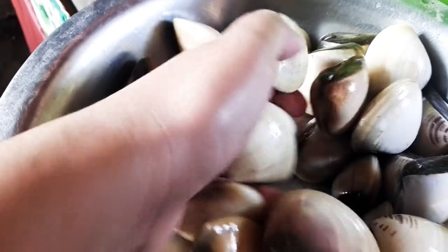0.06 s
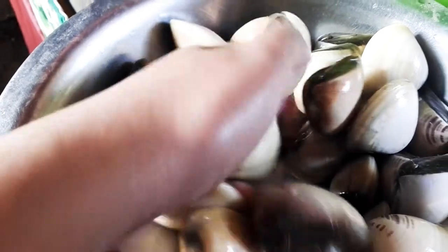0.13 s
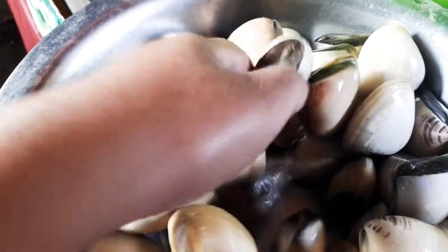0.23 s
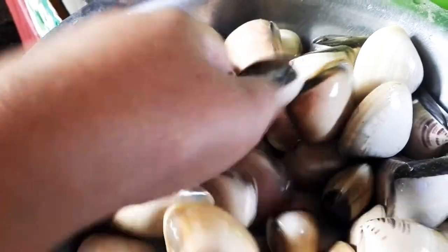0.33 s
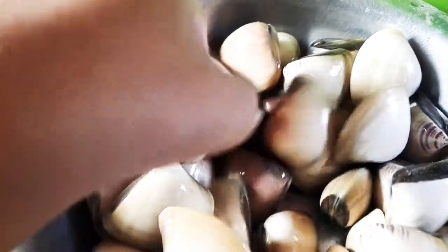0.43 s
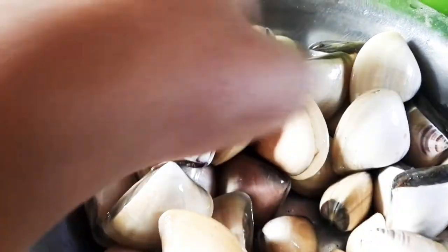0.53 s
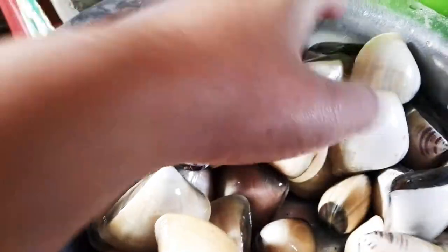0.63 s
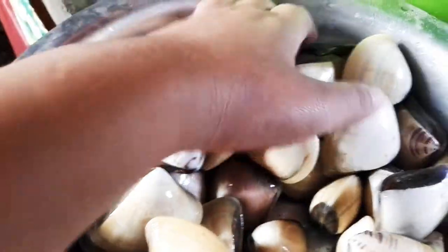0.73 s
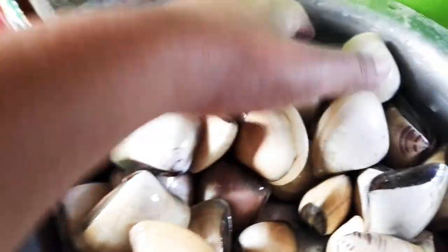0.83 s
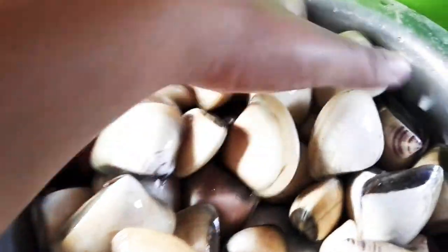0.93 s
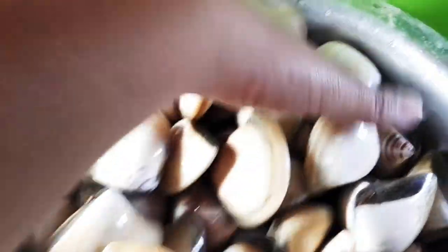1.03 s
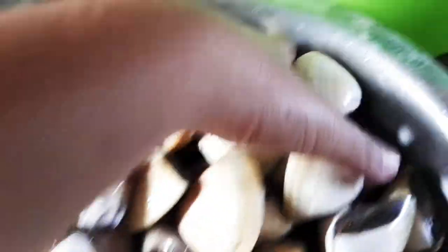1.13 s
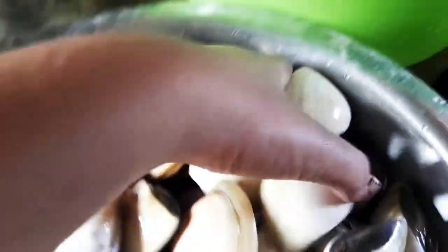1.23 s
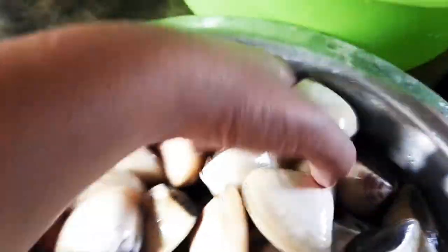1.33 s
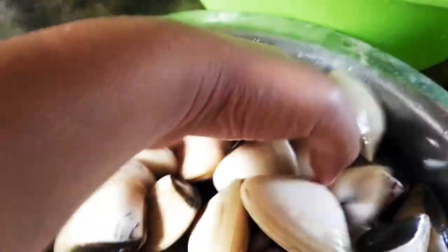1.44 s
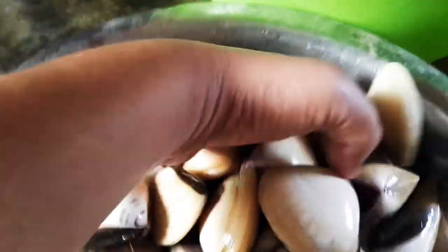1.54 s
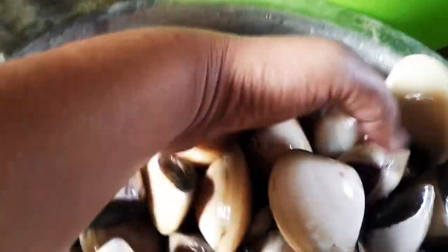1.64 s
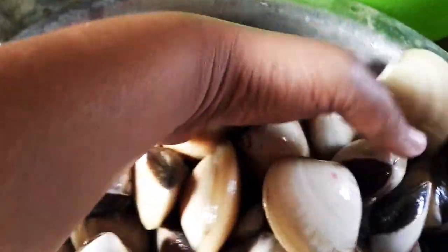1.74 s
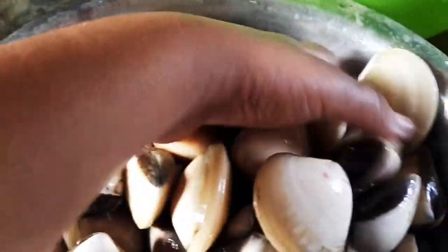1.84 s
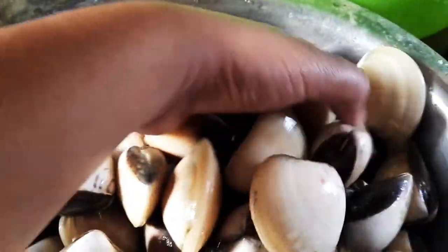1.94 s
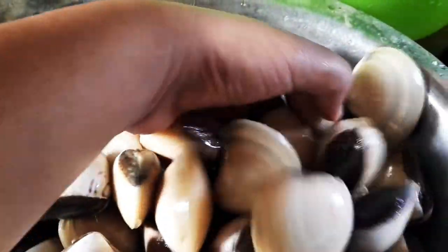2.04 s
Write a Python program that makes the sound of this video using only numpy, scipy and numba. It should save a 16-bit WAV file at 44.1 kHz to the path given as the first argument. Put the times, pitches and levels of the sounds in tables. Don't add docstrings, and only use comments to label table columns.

```python
import sys
import numpy as np
from scipy import signal
from scipy.io import wavfile
from scipy.ndimage import uniform_filter1d
from numba import njit

SR = 44100
rng = np.random.default_rng(int(sys.argv[2]) if len(sys.argv) > 2 else 0)


def voltage_ratio(level):
    return 10 ** (np.asarray(level, float) / 20)


def store_wav(level_fs):
    pcm = np.round(np.clip(np.atleast_2d(level_fs), -1, 1) * 32767)
    wavfile.write(sys.argv[1], SR, pcm.T.astype(np.int16))


N = 92610

# pitch_hz, density_db (dB per Hz)
KITCHEN_AIR = [(30, -3), (60, -7), (130, -9), (200, -27), (400, -37), (1000, -35), (2500, -46),
               (14000, -70)]
# time_s, firing_hz, level_db
ENGINE_CLIMB = [
    (.85, 110, -60),
    (1.08, 119, -51),
    (1.41, 128, -49),
    (1.45, 131, -58),
    (1.55, 133, -51),
    (1.68, 134, -53),
]
# pitch_hz, left_minus_right_db
PORT_SHADING = [(200, 5.5), (350, 0), (700, -14), (1300, -2.5), (4000, -.5), (10000, 2)]
# time_s, effort_db, weight_db (how deep in the heap it digs)
STIRRING = [(.03, -62.5, -5), (.112, -62, -6), (.19, -26, 8.5), (0.299, -38, -2.5), (.36, -25.5, 4),
            (0.439, -29, 1), (0.531, -47, -11), (0.601, -88, -7.5), (.71, -65.5, -11.5), (.8, -55, -12),
            (0.859, -40.5, -23), (0.978, -33, -6), (1.181, -41, 3), (1.258, -44, 2.5), (1.482, -28.5, 4.5),
            (1.8, -36, -7.5), (1.992, -48.5, -11.5), (2.04, -39.5, -1)]
# pitch_hz, density_db (dB per Hz)
SHELL_RING = [(150, -36.5), (260, -6), (445, -8.5), (776, -2.5), (1160, -4), (1860, -0.5), (14500, -20)]
# pitch_hz, width_hz, level_db
BOWL_MODES = [(305.9, 25.6, 0), (450, 18, -2.5), (531.6, 54, 1.5), (775, 31, 5), (1880, 28, 5.5),
              (2882, 20, 3.5)]
# time_s, peak_db, main_ring_hz, brightness_db, weight_db
STIRRED_CLACKS = [(0.074, -35, 6000, -2, -6), (0.091, -37, 2450, -2.5, -11), (0.118, -24.5, 781, -17.5, 12),
                  (0.133, -13.5, 3140, -26, 2), (.201, -24, 730, -17, 7), (0.206, -18.5, 4500, -27.5, -17),
                  (0.219, -1, 700, -29.5, 2.5), (.227, -8.5, 493, -31, 0), (0.236, -5, 5300, -4.5, 8.5),
                  (0.276, 0.5, 1990, -26, -15), (.301, -3, 800, -19.5, -10), (0.31, -8, 865, -13.5, -9),
                  (0.38, -19, 860, -24.5, 13), (0.4, -14.5, 824, -11.5, 11.5),
                  (0.408, -6.5, 783, -27, 11.5), (.419, -4.5, 1680, -13, -2), (.432, -18.5, 465, -22.5, 16),
                  (0.449, -2, 1184, -11, -18), (0.469, -5, 2990, -12.5, 2), (.479, -8.5, 3350, -30, -15),
                  (0.503, -12, 2330, -4.5, 5), (.514, -16, 4200, -12, 8.5), (0.729, -35, 750, 2.5, -14),
                  (0.813, -8.5, 980, -33, -5), (0.827, -13, 2180, -17, -18), (0.835, -17, 1254, -12, -5),
                  (.898, -25.5, 2290, -24.5, -12), (0.911, -13.5, 2960, -15.5, -10),
                  (0.942, -6, 2810, -32, -12), (0.947, -16.5, 920, -29, -8), (0.957, -12.5, 750, -2, 12),
                  (.992, -20, 760, -32, -1), (1.059, -15, 1360, -45.5, 6), (1.095, -20.5, 790, -32.5, 0),
                  (1.128, -18, 920, -6, 5), (1.16, -19, 1370, -7, -4), (1.238, -22, 3130, -20.5, -4),
                  (1.267, -19, 1980, -12.5, 0), (1.307, -9, 4680, -11, 2), (1.323, -17, 790, -5, 6)]
# time_s, peak_db, main_ring_hz, brightness_db, weight_db
SETTLING_CLACKS = [(1.359, -17, 740, -6, 3), (1.414, -15.5, 3100, -43, -5), (1.442, -10.5, 2650, -44, 6),
                   (1.456, -15.5, 596, 0, 8), (1.474, -13, 770, -27.5, 11), (1.489, -2.5, 3390, -13, -1),
                   (1.496, -6.5, 810, -14.5, 8.5), (1.514, -11, 443, -23, 2), (1.558, -12, 1670, -16.5, 6),
                   (1.598, -15, 2680, -2, 3), (1.63, -17, 2530, -25, 5), (1.64, -3, 4890, -13, 3),
                   (1.681, -14, 325, -18, 7.5), (1.704, -12.5, 2870, -37, -2), (1.722, -10, 765, -12.5, 6),
                   (1.751, -25.5, 327, 4.5, 10), (1.782, -22.5, 450, -15, 19), (1.812, -8, 1720, -25, 8.5),
                   (1.845, -26.5, 2680, -29.5, -6), (1.874, -10.5, 2700, -35, -6),
                   (1.884, -17.5, 2450, -20, 8.5), (1.896, -19.5, 4300, 11.5, -10),
                   (1.904, -26, 2620, -3, -6), (1.976, -25.5, 2500, -13, -14), (2.01, -19, 820, -9.5, -5),
                   (2.045, -21.5, 352, -18, 0), (2.094, -8.5, 2650, -13.5, 1)]
# start_s, length_s, level_db, main_ring_hz, brightness_db
TUMBLES = [(.001, .025, -41, 1465, -16), (0.122, 0.06, -24.5, 815, -8.5), (0.213, 0.036, -6, 428, -39),
           (0.252, .014, -4.5, 1692, -10.5), (0.261, 0.022, 6.5, 1880, -15), (.259, 0.022, 4, 775, -34.5),
           (0.637, 0.071, -47, 1300, -49), (0.287, .04, -1.5, 450, -14), (0.323, .03, -18, 527, -12.5),
           (0.373, .03, -8.5, 792, -16), (0.399, .04, -6, 916, -18.5), (0.46, 0.027, -14, 450, -15.5),
           (0.503, 0.037, -21, 450, -32.5), (0.727, .075, -34.5, 3240, -30.5),
           (0.903, 0.032, -21.5, 2660, -8.5), (0.934, 0.044, -12, 830, -16), (0.971, .05, -16.5, 752, -9),
           (1.131, .06, -14.5, 1434, -18), (1.365, 0.034, -22.5, 800, -19),
           (1.485, 0.025, -8.5, 3096, -12.5), (1.501, 0.049, -12, 375, -12),
           (1.54, 0.048, -17.5, 450, -6.5), (1.579, 0.033, -16.5, 2600, -5),
           (2.003, 0.056, -17.5, 359, -13)]

KITCHEN_DB, ROOM_DB, ROOM_T60_S, ROOM_DAMP = -56.5, -11, .165, 0.46
BASS_SIDE = .07
PORT_LAG_S, LAG_SPREAD_S, PAN_SPREAD_DB = .00026, .0003, 6
BOWL_DB, TABLE_DB, BODY_HZ = -15, 14.5, 292
THUD_AT_S, THUD_DB, THUD_HZ, THUD_T60_S = .259, -9.5, 78, 0.04
RING_S, RING_SLOPE, TILT = 0.029, 0.38, 0.72
LIGHT_DB_PER_OCT, HEAVY_HZ = 3.5, 653
KNOCK_DB, SLIDE_DB, GRIND_DB = -15, -19, -10
MAIN_DB, BLOW_DB = 2, 6.5
CHATTER_S, CHATTER_DB, GRAZE_S, GRAZE_DB = .014, -6, .0015, -13
SNAP_DB, SNAP_SHARE = -5.5, 0.33
CRACK_S, CRACK_DB, RASP_DB = 0.026, -4.5, -14
SCATTER_DB = 2
STICK_DB, STICK_S = 5, 0.015


def table(rows, hz):
    rows = np.array(rows)
    return np.interp(np.log(hz), np.log(rows[:, 0]), rows[:, 1])


def band(x, lo_hz, hi_hz):
    return signal.sosfilt(signal.butter(2, [lo_hz, hi_hz], "band", fs=SR, output="sos"), x)


def walk(rate_hz):
    k = int(SR / rate_hz)
    held = np.repeat(rng.standard_normal(N // k + 1), k)
    return 2.0 * uniform_filter1d(uniform_filter1d(held, k), k)[:N]


def kitchen():
    out = 0
    swell_db = np.interp(np.arange(N) / SR, [.15, .6, .8, 1.7, 1.9], [8.5, -2.5, -2, 3.5, 1])
    for hz in 28 * 2 ** np.arange(0, 9, .5):
        mid, side = band(rng.standard_normal((2, N)), hz / 1.1, hz * 1.2)
        level_db = table(KITCHEN_AIR, hz) + 0.82 * walk(2.8) + swell_db * (hz < 250)
        spread = np.clip(hz / 900., BASS_SIDE, 1) * side * np.array([[1], [-1]])
        out = out + voltage_ratio(level_db) * (mid + spread)
    return out * voltage_ratio(KITCHEN_DB + 3) / np.sqrt(np.mean(out ** 2))


def engine():
    t = np.arange(N) / SR
    time_s, firing_hz, level_db = np.array(ENGINE_CLIMB).T
    db = np.interp(t, np.r_[time_s[0] - .1, time_s, time_s[-1] + .06], np.r_[-85, level_db, -85])
    hz = np.interp(t, time_s, firing_hz) * (1 + 0.023 * walk(27))
    return np.sqrt(2) * voltage_ratio(db + 2 * walk(18)) * np.sin(2 * np.pi * np.cumsum(hz) / SR)


@njit
def walls(x, lags, gain, damp):
    line, soft, out = np.zeros((8, 4096)), np.zeros(8), np.zeros((2, len(x)))
    for i in range(len(x)):
        total = 0.
        for k in range(8):
            soft[k] += (1 - damp) * (gain[k] * line[k, (i - lags[k]) & 4095] - soft[k])
            total += soft[k]
            out[k % 2, i] += soft[k]
        for k in range(8):
            line[k, i & 4095] = x[i] + soft[k] - total / 4
    return out


def room(near):
    lags = rng.integers(250, 1300, 8)
    gain = voltage_ratio(-60 * lags / SR / ROOM_T60_S)
    return voltage_ratio(ROOM_DB) * walls(band(near.mean(axis=0), 300., 14000.), lags, gain, ROOM_DAMP)


def thud():
    age = np.maximum(np.arange(N) / SR - THUD_AT_S, 0)
    swell = 1 - np.exp(-age / 0.01)
    return voltage_ratio(THUD_DB - 60 * age / THUD_T60_S) * swell * np.sin(2 * np.pi * THUD_HZ * age)


def bowl(push, shove):
    out = np.zeros((2, N))
    for hz, width_hz, mode_db in BOWL_MODES:
        p = np.exp((2j * np.pi * hz - np.pi * width_hz) / SR)
        drive = shove if hz < HEAVY_HZ else push
        z = signal.lfilter([1], [1, -p], drive) * voltage_ratio(mode_db + BOWL_DB)
        left = (z * np.exp(-2j * np.pi * hz * PORT_LAG_S)).imag * voltage_ratio(table(PORT_SHADING, hz))
        out = out + np.array([left, z.imag])
    return out


@njit
def rings(start, hz, t60, left, right, lag, sr, n):
    out = np.zeros((2, n + 200))
    for g in range(len(hz)):
        p = np.exp(complex(-6.9 / (t60[g] * sr), 2 * np.pi * hz[g] / sr))
        z, i0, j0 = 1. + 0j, int(start[g] * sr), max(int((start[g] + lag[g]) * sr), 0)
        for i in range(max(min(int(t60[g] * sr), n - max(i0, j0)), 0)):
            out[0, j0 + i] += left[g] * z.imag
            out[1, i0 + i] += right[g] * z.imag
            z *= p
    return out[:, :n]


def contacts(t, db, bright_db, weight_db, main_hz=None, main_db=0, count=10, share=1.):
    u = rng.random((len(t), count))
    g = np.tanh(rng.standard_normal((len(t), count + 2)))
    hz = 250 * 56 ** ((np.arange(count) + u) / count)
    gain = db[:, None] + table(SHELL_RING, hz) + 10 * np.log10(hz / 800) + 2.2 * g[:, :count]
    gain = gain + TILT * bright_db[:, None] * np.clip(np.log2(hz / 1500) / 2, 0, 1)
    gain = gain + weight_db[:, None] * np.clip(2 * np.log2(HEAVY_HZ / hz), 0, 1)
    t60 = voltage_ratio(0.89 * g[:, count - 1::-1])
    if main_hz is not None:
        gain = gain - LIGHT_DB_PER_OCT * np.clip(np.log2(main_hz[:, None] / hz), 0, 2)
        hz[:, 0] = main_hz * (1 + 0.023 * g[:, 0])
        gain[:, 0] = db + main_db
        t60[:, 0] = 1
    t60 = t60 * share * RING_S * (1000 / hz) ** RING_SLOPE
    aside = np.clip(hz / 1200, 0, 1)
    pan = table(PORT_SHADING, hz) + PAN_SPREAD_DB * g[:, [count]] * aside
    lag = PORT_LAG_S + LAG_SPREAD_S * g[:, [count + 1]] * aside
    start = t[:, None] + 0.00022 * u[:, ::-1]
    sign = np.sign(g[:, :count])
    modes = (start, hz, t60, sign * voltage_ratio(gain + pan / 2), sign * voltage_ratio(gain - pan / 2), lag)
    return rings(*[np.ascontiguousarray(a).ravel() for a in modes], float(SR), N)


def blows(t, db):
    return np.bincount(np.clip((t * SR).astype(int), 0, N - 1), voltage_ratio(db), N)


def clacks(count=5):
    t, db, hz, bright, weight = np.array(STIRRED_CLACKS + SETTLING_CLACKS).T[:, :, None]
    u = rng.random((len(t), 2, count))
    late = (np.arange(count) + u[:, 0]) / count * (np.arange(count) > 0)
    fade = (CHATTER_DB - 14 * late + 8 * (u[:, 1] - .5)) * (late > 0)
    late[:, -1], fade[:, -1] = -GRAZE_S / CHATTER_S, GRAZE_DB
    main_db = np.where(late != 0, MAIN_DB, BLOW_DB)
    same = 0 * late
    return t + late * CHATTER_S, db + KNOCK_DB + fade, bright + same, weight + same, hz + same, main_db


def slides(size=20):
    t, length, db, hz, bright = np.array(TUMBLES).T[:, :, None]
    u, stir = rng.random((len(t), 2, size)), np.array(STIRRING)
    late = (np.arange(size) + u[:, 0]) / size
    swell = 20 * np.log10(0.094 + np.sin(np.pi * late ** 0.63)) + 7 * (u[:, 1] - .5)
    weight = np.interp(t, stir[:, 0], stir[:, 2])
    same = 0 * late
    return t + late * length, db + SLIDE_DB + swell, bright + same, weight + same, hz + same, MAIN_DB + same


def grinding(count=4200):
    stir, u = np.array(STIRRING), rng.random((count, 3))
    t = (np.arange(count) + u[:, 0]) / count * N / SR
    db = np.interp(t, stir[:, 0], stir[:, 1]) + GRIND_DB + STICK_DB / 3
    db = db - SCATTER_DB * np.log(1 - u[:, 1]) + 1.67 * walk(24.99)[(t * SR).astype(int)]
    hit_s = np.r_[np.array(STIRRED_CLACKS + SETTLING_CLACKS)[:, 0], 2 * N / SR]
    to_next_s = hit_s[np.searchsorted(hit_s, t)] - t
    db = db - STICK_DB * np.exp(-to_next_s / STICK_S)
    return t, db, np.interp(t, stir[:, 0], stir[:, 2]), u[:, 2]


def grit(impulses):
    fade = np.exp(-np.log(1000) / (CRACK_S * SR))
    puff = signal.lfilter([1], [1, -fade], impulses)
    tilt = voltage_ratio(PORT_SHADING[-1][1] * np.array([[.25], [-.25]]))
    return puff * band(rng.standard_normal((2, N)), 2300.0, 13000.0) * tilt


def shells():
    t, db, bright, weight, hz, main_db = [np.r_[a.ravel(), b.ravel()] for a, b in zip(clacks(), slides())]
    tg, dg, wg, chance = grinding()
    ring = contacts(t, db, bright + 16, weight, hz, main_db, count=12)
    ring = ring + contacts(tg, dg, 10 * (chance - .5), wg, count=4)
    hit = main_db == BLOW_DB
    ring = ring + contacts(t[hit], db[hit] + SNAP_DB, bright[hit] + 16, weight[hit], count=24, share=SNAP_SHARE)
    rasp = grit(blows(t, db + CRACK_DB + bright + 5.5) + blows(tg, dg + RASP_DB))
    sign = np.sign(rng.standard_normal(N))
    small_db = LIGHT_DB_PER_OCT * np.clip(np.log2(hz / 1000), 0, 2)
    push = sign * (blows(t, db - small_db) + blows(tg, dg))
    shove = sign * (blows(t, db + weight) + blows(tg, dg + wg))
    table_top = voltage_ratio(TABLE_DB) * band(shove, 71.0, 270.)
    high_pass = signal.butter(5, BODY_HZ, "high", fs=SR, output="sos")
    return signal.sosfilt(high_pass, ring + rasp + bowl(push, shove)) + table_top


def scene():
    near = shells()
    return near + room(near) + thud() + kitchen() + engine()


def low_pass(x):
    return signal.sosfilt(signal.butter(12, 14940, fs=SR, output="sos"), x)


def record(dry):
    top_cut = signal.ellip(8, .2, 70, 14700, fs=SR, output="sos")
    mix = np.clip(signal.sosfilt(top_cut, dry), -1, 1)
    return low_pass(mix)


dry = scene()
out = record(dry)
store_wav(out)
```